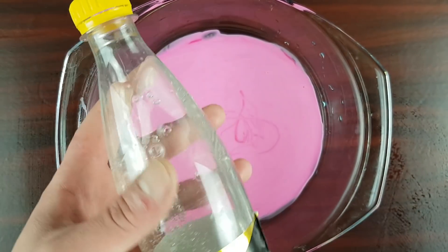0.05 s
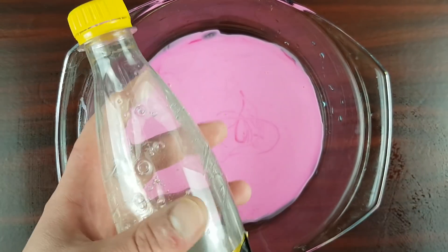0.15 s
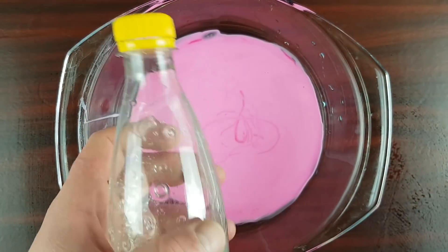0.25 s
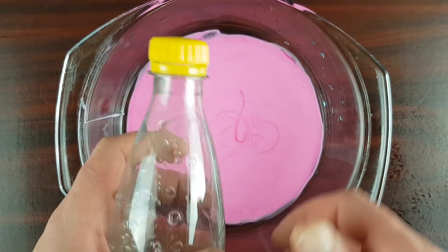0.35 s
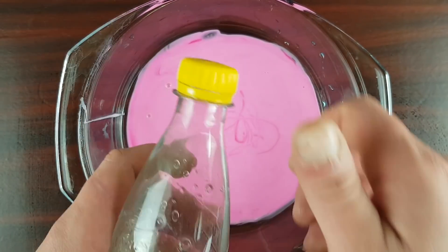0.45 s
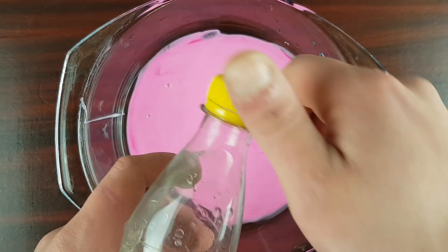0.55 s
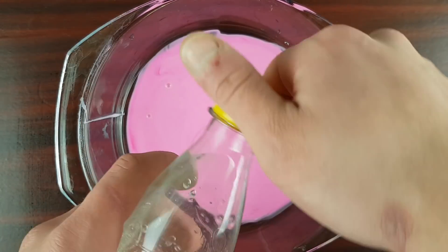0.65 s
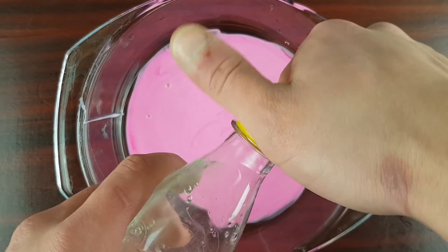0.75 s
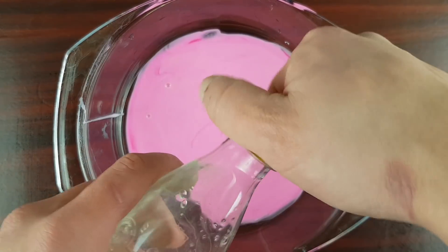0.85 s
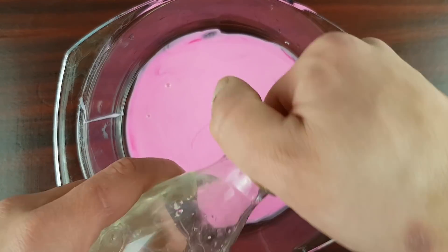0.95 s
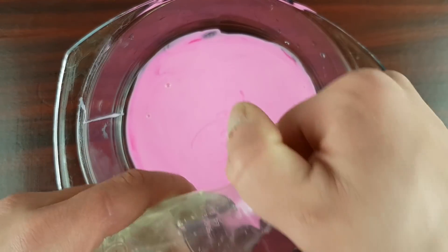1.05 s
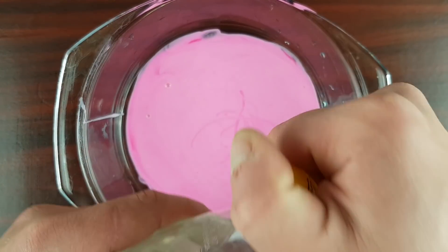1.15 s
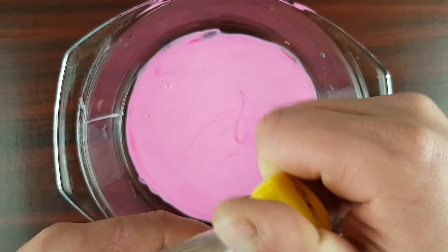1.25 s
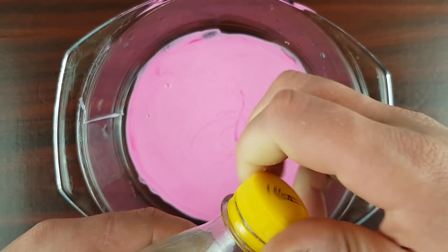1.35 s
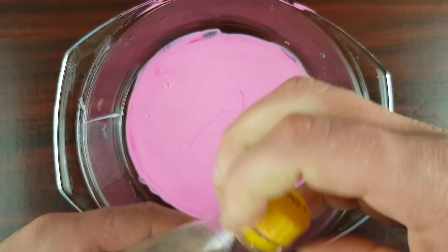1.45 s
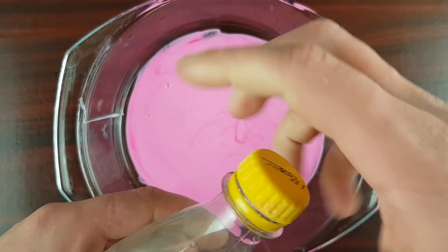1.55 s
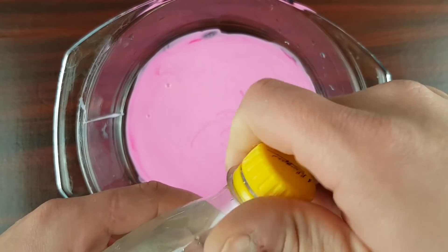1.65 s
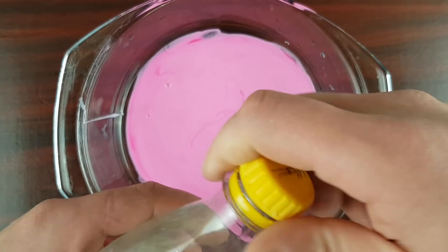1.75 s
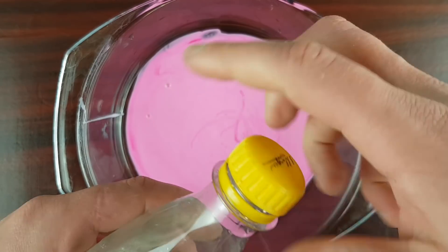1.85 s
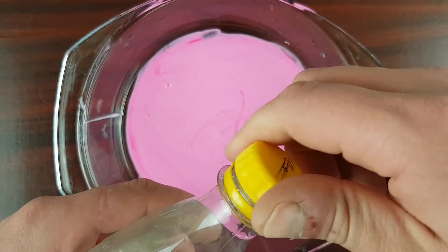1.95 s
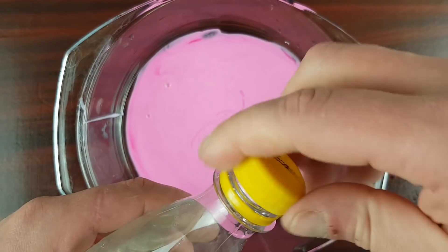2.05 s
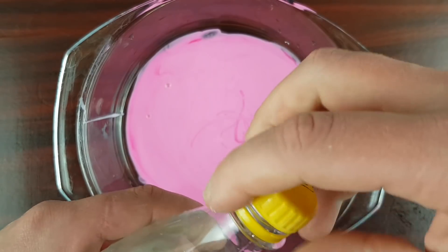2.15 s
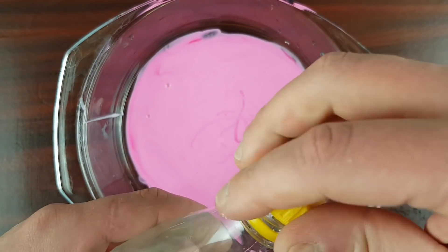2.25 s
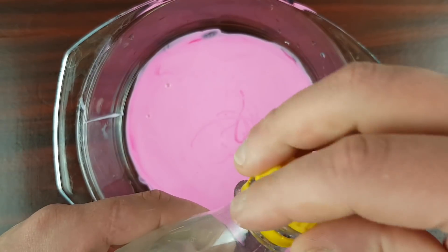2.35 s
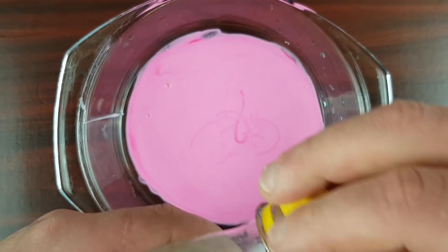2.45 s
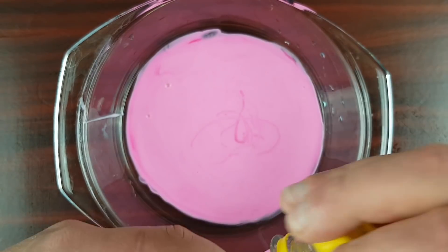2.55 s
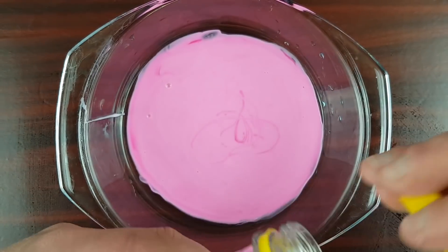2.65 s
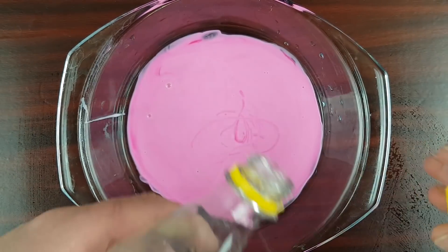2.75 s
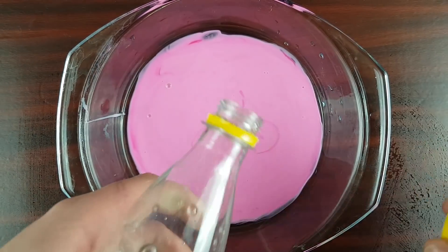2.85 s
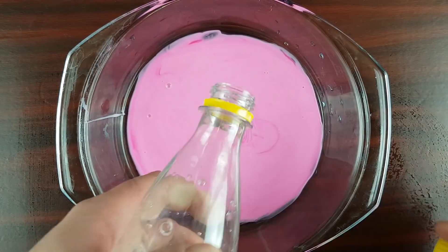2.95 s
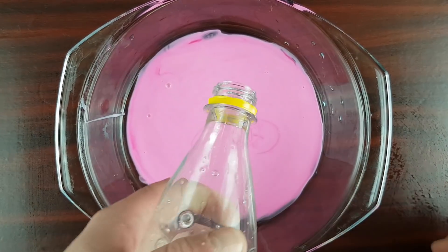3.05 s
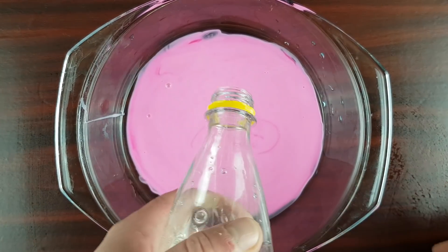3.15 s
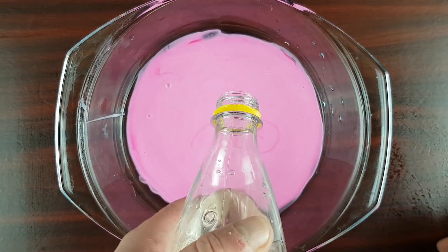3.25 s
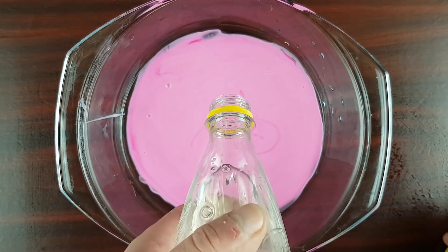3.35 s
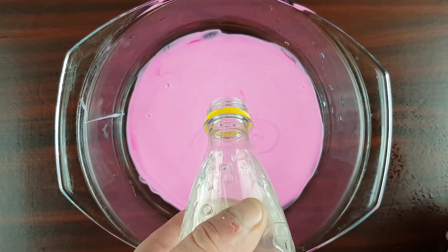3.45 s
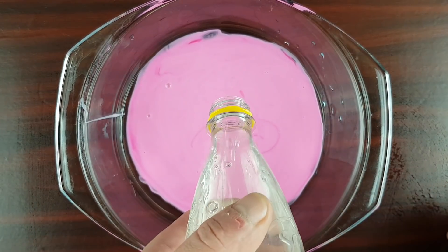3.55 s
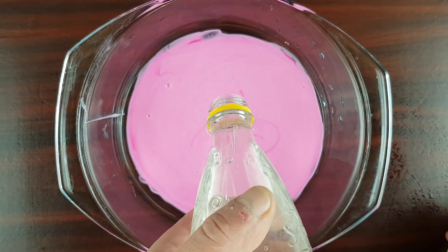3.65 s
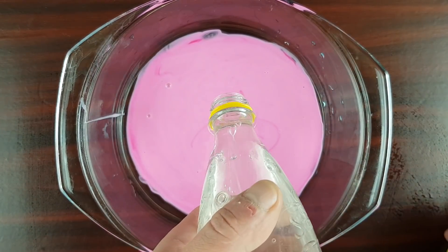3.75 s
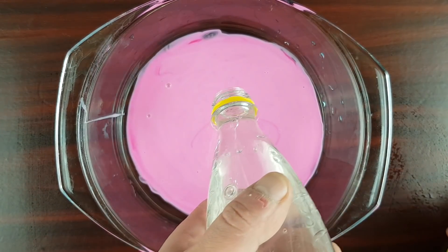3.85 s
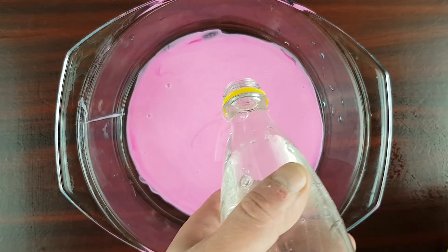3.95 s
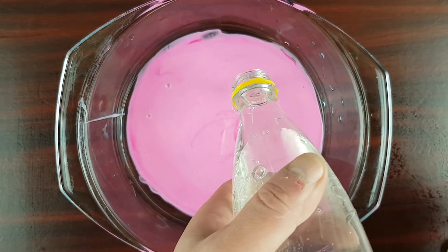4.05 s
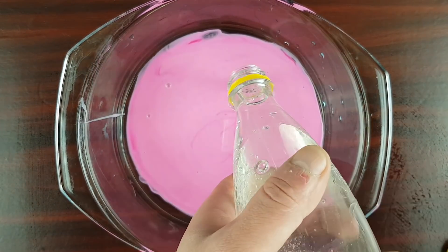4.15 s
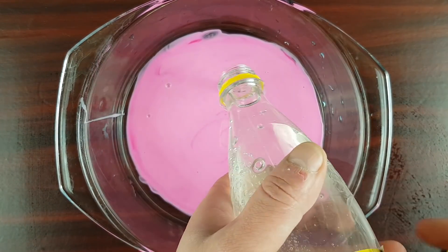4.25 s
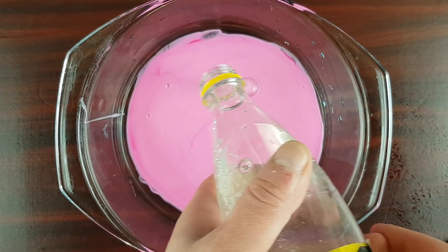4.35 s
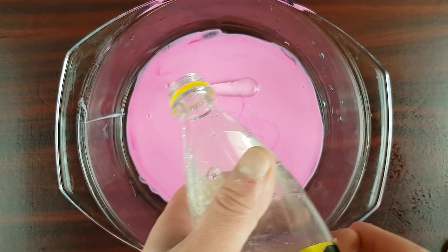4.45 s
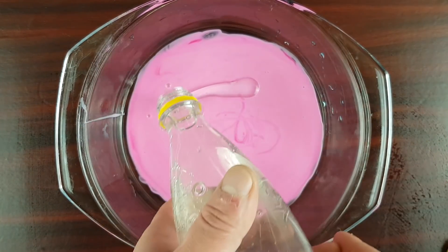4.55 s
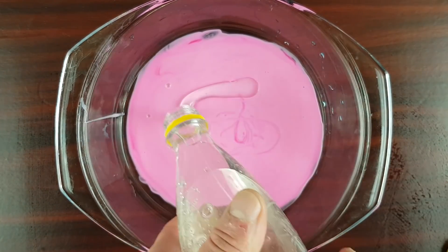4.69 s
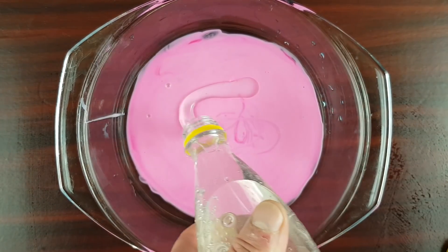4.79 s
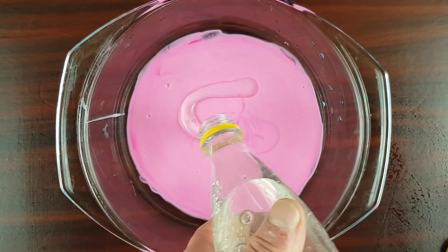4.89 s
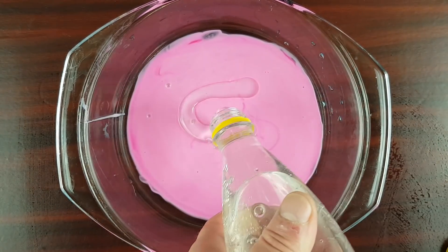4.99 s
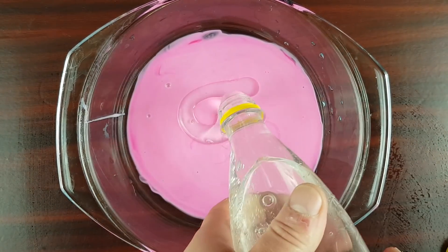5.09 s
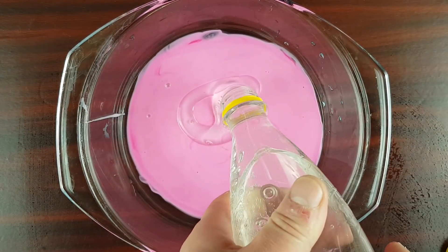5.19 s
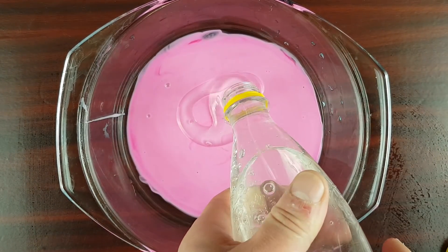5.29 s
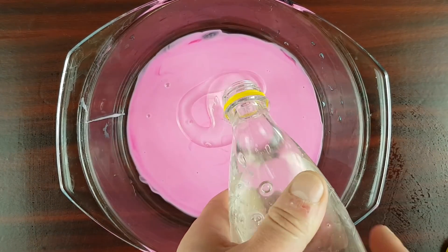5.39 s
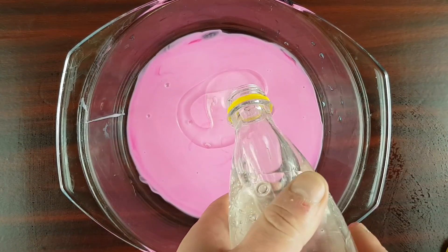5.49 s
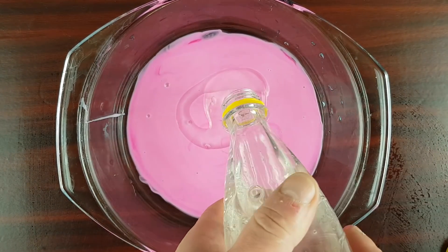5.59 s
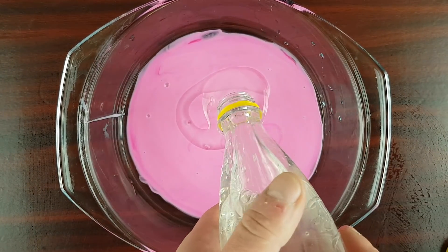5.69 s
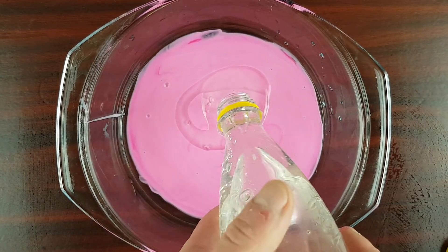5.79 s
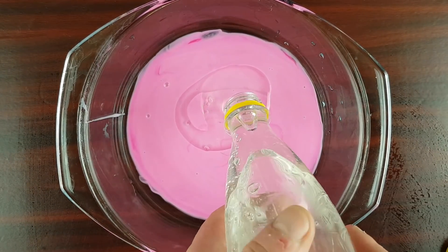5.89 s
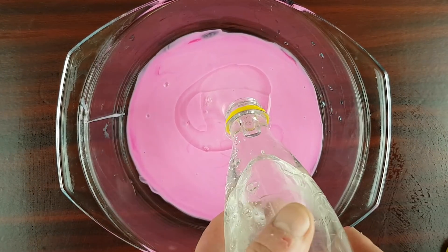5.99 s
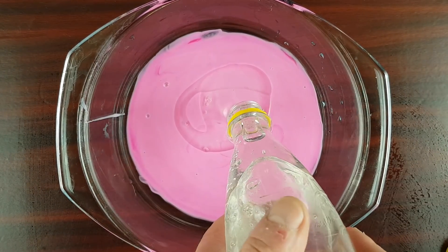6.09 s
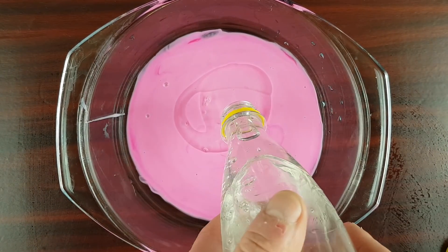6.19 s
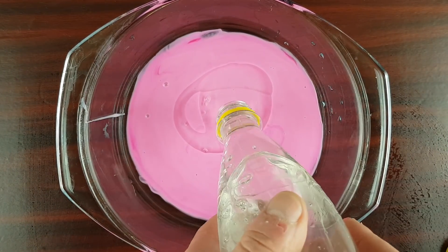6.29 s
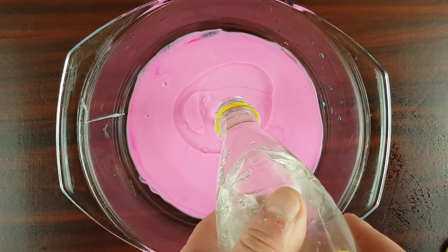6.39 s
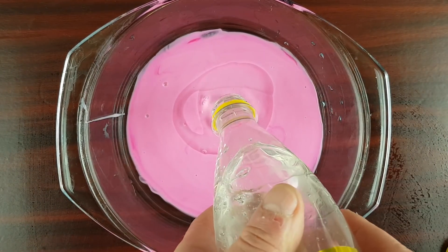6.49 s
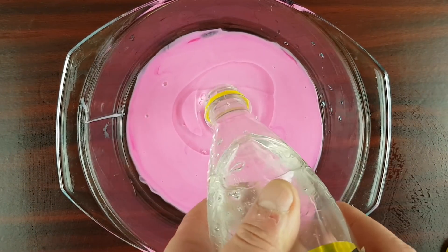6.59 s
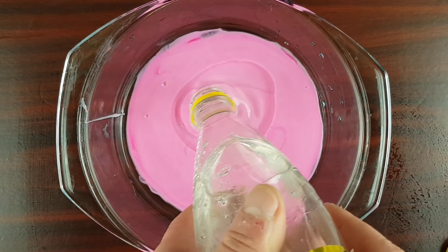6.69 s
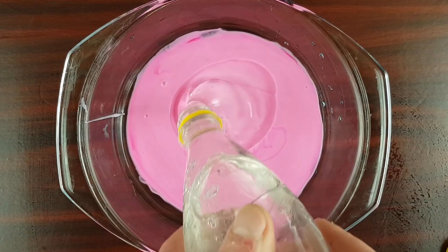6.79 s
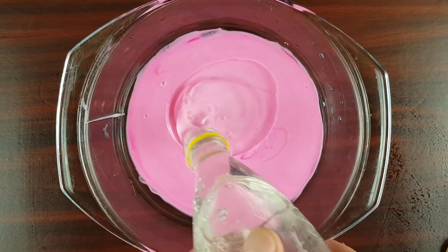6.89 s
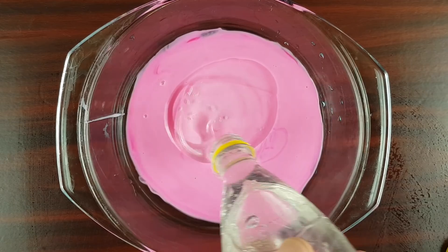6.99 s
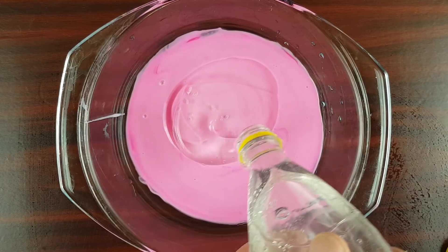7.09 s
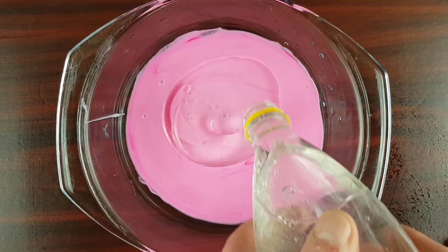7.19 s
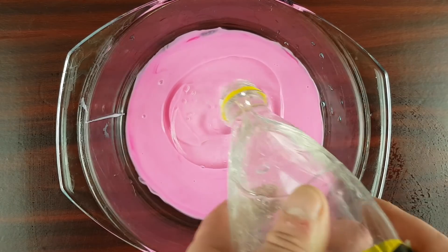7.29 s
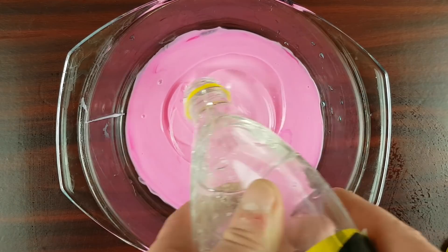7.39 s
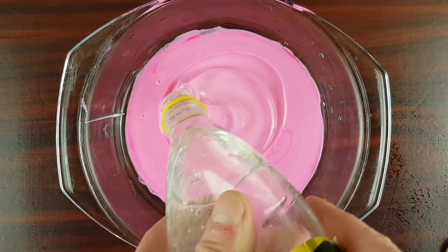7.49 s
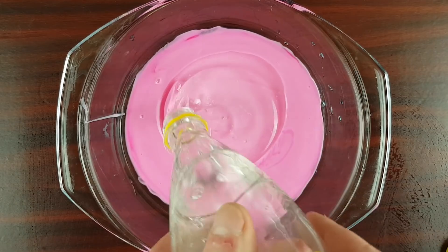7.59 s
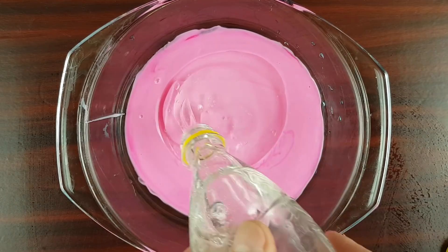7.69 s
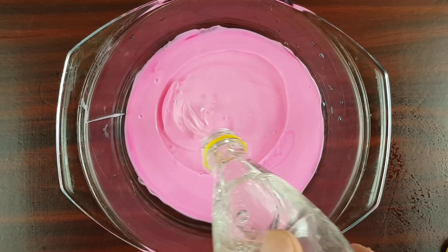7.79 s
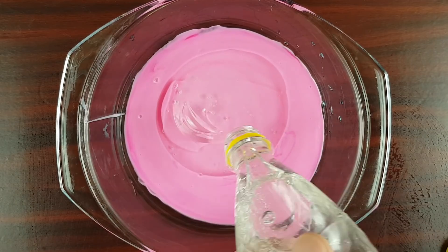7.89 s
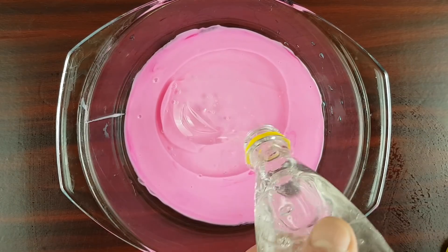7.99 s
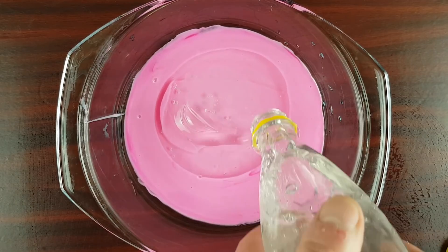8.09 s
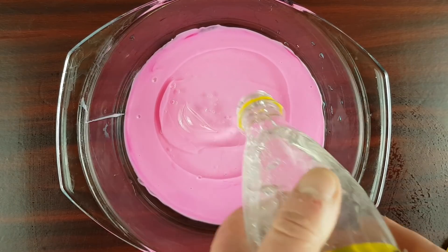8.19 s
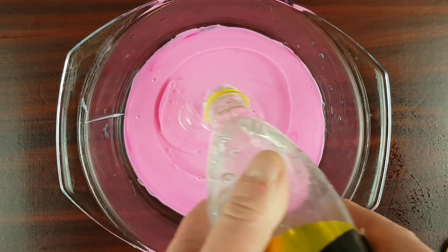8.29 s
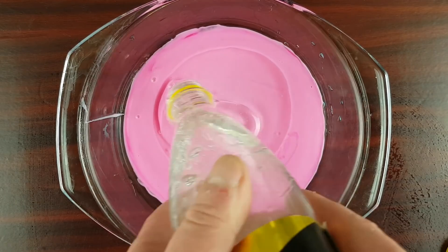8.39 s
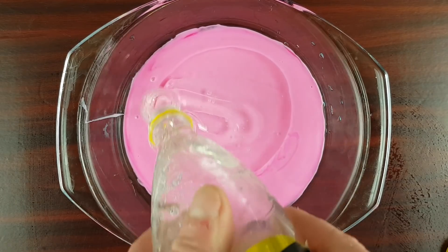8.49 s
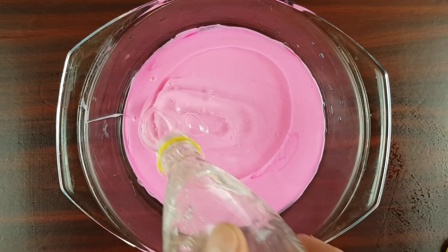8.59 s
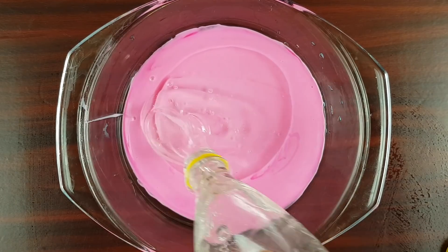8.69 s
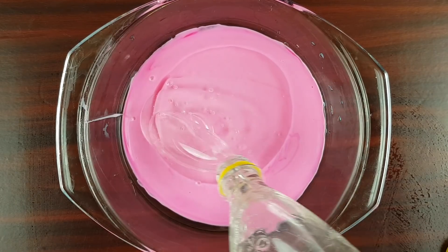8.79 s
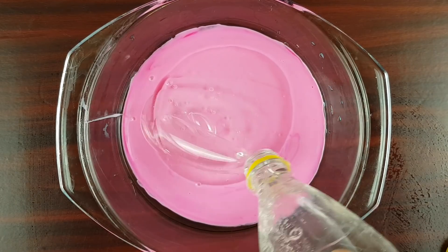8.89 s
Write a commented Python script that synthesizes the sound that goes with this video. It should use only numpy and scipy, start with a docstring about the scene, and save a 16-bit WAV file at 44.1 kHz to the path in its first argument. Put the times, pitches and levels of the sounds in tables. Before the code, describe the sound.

Small gritty cap creaks give way to sporadic loud crackling pops of a squeezed plastic bottle in a small room, over faint hiss.

```python
"""A thin plastic bottle is uncapped close by in a small room, then squeezed to pour a thick, silent liquid.
After a low handling bump the cap creaks and ticks as runs of tiny catches; skin hisses on its ribs as noise.
As the uncapping ends, a low sine drone steps up in pitch; a noise rumble and a hum have grown under it.
Then the wall buckles under the thumb: struck modes and noise make sharp pops and dull thumps.
Late on, a gliding note marks a bubble at the neck and the bottle's air booms; noise hisses throughout."""
import sys
import numpy as np
from scipy import signal
from scipy.fft import rfft, irfft, next_fast_len
from scipy.io import wavfile

SR = 44100
rng = np.random.default_rng(int(sys.argv[2]) if len(sys.argv) > 2 else 0)


def output_pcm(signal):
    """Save a mono or channel-first signal as 16-bit PCM at the path in sys.argv[1].

    Samples are clipped to [-1, 1] before scaling.
    """
    pcm = np.clip(np.atleast_2d(signal).T, -1, 1) * 32767
    wavfile.write(sys.argv[1], SR, np.round(pcm).astype(np.int16))


N = 394254
TIME = np.arange(N) / SR

# modes of the bottle wall: f/Hz, relative level/dB, t60/s
SHELL_MODES = [(288, -24.5, 0.023), (365, -13.5, 0.05), (585.6, -16.5, 0.053), (604, -7, 0.028),
               (706, -10.5, 0.025), (982, -23.5, 0.074), (1094, -32, 0.038), (1470, -29, 0.01),
               (2010, -19.5, 0.029), (2250, -32, 0.067), (2383, -23, 0.029), (2777, -46, 0.061),
               (3210, -29, 0.023), (4516, -20.5, 0.0099), (4540, -39, 0.046)]
# slips of the cap and of the fingers, and a low handling bump at the start:
# t/s, level/dB, length/s, highest f/Hz
SLIP_EVENTS = [(0.367, -53.5, 0.057, 82), (0.62, -50, 0.0044, 5230), (0.898, -51.5, 0.0087, 5920),
               (0.922, -54.5, 0.0027, 347), (1.297, -47.5, 0.011, 1900), (1.407, -39, 0.0073, 4000),
               (1.441, -36.5, 0.01, 3170), (1.443, -50.5, 0.009, 350), (1.496, -48, 0.0028, 3000),
               (1.622, -45, 0.0044, 1010), (1.704, -33.5, 0.0051, 4600), (1.783, -37.5, 0.0054, 4400),
               (1.99, -44, 0.0095, 5170), (2.016, -54, 0.052, 3170), (2.095, -46.5, 0.013, 4130),
               (2.262, -44, 0.02, 2980), (2.5, -49.5, 0.0076, 2020), (2.592, -43, .015, 3370),
               (3.508, -45.5, 0.0088, 2400), (3.647, -51, 0.0032, 1000), (5.839, -46, 0.003, 2960),
               (7.322, -53, 0.002, 4600), (7.393, -44, 0.0022, 4570)]
# spectrum of cracking plastic: f/Hz, relative level/dB per Hz
CRACK_SPECTRUM = [(400, 7), (1000, 9), (2200, 11), (4800, -0.5), (7000, -14), (15000, -12)]


def from_db(db):
    """Amplitude gain is ten to the power of the level in decibels over 20."""
    return 10 ** (np.asarray(db) / 20)


def rms_one(x):
    """Dividing by the root mean square gives unit power."""
    return x / np.sqrt(np.mean(x ** 2) + 1e-20)


def add(track, s, sound):
    """Superposition: sounds add linearly, here from time s on."""
    start = max(round(s * SR), 0)
    track[start:start + len(sound)] += sound[:N - start]


def low_pass(x, hz, order):
    """Causal Butterworth low-pass: a maximally flat passband."""
    sections = signal.butter(order, min(hz, SR * .45), fs=SR, output="sos")
    return signal.sosfilt(sections, x + 1e-18)


def high_pass(x, hz, order):
    """Causal Butterworth high-pass: a maximally flat passband."""
    sections = signal.butter(order, min(hz, SR * .45), "high", fs=SR, output="sos")
    return signal.sosfilt(sections, x + 1e-18)


def hump(x, hz, octaves):
    """A broad band-pass: high-pass and low-pass in series, some octaves to each side."""
    return low_pass(high_pass(x, hz / 2 ** octaves, order=2), hz * 2 ** octaves, order=2)


def noise(colour, size):
    """Spectral shaping: white noise weighted by a table of f/Hz, level/dB, at unit power."""
    hz, db = np.transpose(colour)
    padded = next_fast_len(size)
    grid = np.fft.rfftfreq(padded, 1 / SR) + 0.0013
    bass_cut = np.minimum(grid / hz[0], 1) ** 2   # 12 dB per octave below the first point
    gain = from_db(np.interp(np.log(grid), np.log(hz), db)) * bass_cut
    spectrum = rfft(rng.standard_normal(padded)) * gain
    return rms_one(irfft(spectrum, padded)[:size])


def ring(t, hz, t60):
    """A struck mode: a sine whose exponential decay takes t60 seconds for 60 dB."""
    return np.sin(2 * np.pi * hz * t) * from_db(-60 * t / t60)


def pops(runaway_s=0.00056, crack_db=-11, crack_t60=0.031, dent_t60=0.025, radiate_hz=65):
    """Snap-through buckling: the wall gives way ever faster; dent and shell ring, the filled bottle thumps."""
    # buckles of the wall: t/s, level/dB, sharpness f/Hz, shell ring/dB, dent f/Hz, dent level/dB
    buckles = [(5.0444, -16.5, 1426, -1, 243, 2), (5.343, -43.5, 486, -12, 281, -6),
               (5.4893, -7, 6100, 0.5, 630, -4.5), (5.509, -17.5, 5770, 10.5, 1880, -2),
               (6.303, -42.5, 800, -8, 301, -2.5), (7.2521, -7.5, 4970, -1, 329, -10.5),
               (7.6771, -11, 2400, -7.5, 662, -11), (7.938, -24.5, 2070, 1.5, 296, -13.5),
               (7.967, -34, 910, -10.5, 324, -26.5), (8.0584, -8.5, 9150, 0.5, 1860, -20),
               (8.399, -36.5, 1000, 0, 310, -2), (8.533, -64, 395, -13, 101, 32),
               (8.7203, -10.5, 4800, 0, 700, -1.5)]
    # a pop sharper than the reference rings brighter and thumps lower and less
    reference_hz, tilt_db_per_octave = 4350, 3
    reference_thump_hz, thump_fall_octaves = 126, 0.16   # pitch fall per octave of sharpness
    reference_thump_db, thump_loss_db_per_octave, thump_t60 = -7.5, 5, 0.034
    # the air in the bottle rings on after the sharpest pop
    boom_s, boom_db, boom_hz, boom_t60 = 8.0584, -20, 115, 0.34

    out, t, lead = np.zeros(N), TIME[:SR // 2], SR // 200
    suction = -np.exp(-TIME[:lead][::-1] / runaway_s)   # grows until the snap
    for s, db, sharp_hz, ring_db, dent_hz, dent_db in buckles:
        sharper = np.log2(sharp_hz / reference_hz)   # octaves
        tilt_db = tilt_db_per_octave * sharper
        thump_db = reference_thump_db - thump_loss_db_per_octave * sharper
        thump_hz = reference_thump_hz / 2 ** (thump_fall_octaves * sharper)
        # each dent has its own shape, so the modes differ a little in level (dB) and pitch (ratio)
        chance = rng.standard_normal((len(SHELL_MODES), 2)) * [1.5, .006]
        shell = np.zeros(len(t))
        for k, ((hz, mode_db, t60), (louder, higher)) in enumerate(zip(SHELL_MODES, chance)):
            gain = from_db(mode_db + tilt_db * np.log2(hz / 1000) + louder)
            shell += gain * ring(t, hz * (1 + higher), t60) * (-1) ** k   # modes alternate in sign
        crack = from_db(crack_db + 2 * tilt_db) * from_db(-60 * t / crack_t60) * noise(CRACK_SPECTRUM, len(t))
        dent = from_db(dent_db) * ring(t, dent_hz, dent_t60)
        thump = from_db(thump_db) * ring(t, thump_hz, thump_t60)
        pop = np.concatenate([suction, from_db(ring_db) * (shell + crack) + dent + thump])
        add(out, s - lead / SR, from_db(db) * low_pass(pop, sharp_hz, order=2))
    add(out, boom_s, from_db(boom_db) * ring(t, boom_hz, boom_t60))
    return high_pass(out, radiate_hz, order=2)   # so small a wall radiates no deep bass


def slips(catches_per_s=700, grit=0.27, shell_db=-15, knock_db=-14, knock_hz=320, knock_t60=0.045,
          release_db=8):
    """Stick-slip friction: a dying run of tiny catches stirs the wall, and the body knocks softly.

    The low handling bump is made in the same way.
    """
    # while the thread grips: start t/s, end t/s
    thread_grip = (1.35, 2.3)
    # a weaker, duller run then comes just before each slip
    catch_lead_s, catch_db, catch_duller_octaves = 0.016, -11, .3
    slip_octaves = 2.6   # the sound reaches this far below its highest frequency

    out, t = np.zeros(N), TIME[:SR // 6]
    wall = sum(from_db(db) * ring(t, hz, t60) * (-1) ** k for k, (hz, db, t60) in enumerate(SHELL_MODES))
    wall = wall / np.linalg.norm(wall)
    knock = from_db(knock_db) * ring(t, knock_hz, knock_t60)
    first_catches = [(s - catch_lead_s, db + catch_db, length, hz / 2 ** catch_duller_octaves)
                     for s, db, length, hz in SLIP_EVENTS if thread_grip[0] < s < thread_grip[1]]
    for s, db, length, high_hz in list(SLIP_EVENTS) + first_catches:
        low_hz = high_hz / 2 ** slip_octaves
        catches = (rng.random(len(t)) < catches_per_s / SR) + grit * rng.standard_normal(len(t))
        run = catches * np.exp(-(t / length) ** 2)
        run[round(min(length / 4, t[-1]) * SR)] += from_db(release_db)   # one catch gets an extra jolt
        run = run + from_db(shell_db) * signal.fftconvolve(run, wall)[:len(t)]
        # the bass falls away gently, then more steeply an octave lower
        run = high_pass(high_pass(run, low_hz, order=1), low_hz / 2, order=1)
        run = low_pass(run, high_hz, order=4)
        run = run * np.sqrt(length * SR / 2) / np.linalg.norm(run)
        add(out, s, from_db(db) * (run + knock))
    return out


def ticks(decay_s=0.0034, body_db=-17, snap_db=13):
    """Impulsive creasing: one bright snap and a very short noise burst, with a little body below."""
    # crisp ticks of the plastic: t/s, level/dB, centre f/Hz
    creases = [(.852, -53.5, 9400), (1.061, -51.5, 10000), (2.880, -50.5, 7400), (4.768, -55.5, 10500),
               (4.976, -52, 4340), (5.045, -54.5, 11000), (5.319, -50, 12450), (5.387, -52.5, 8330),
               (5.4879, -46, 12000), (6.845, -58, 7960), (7.253, -37, 13500), (7.3224, -33.5, 14100),
               (7.39, -39, 13600), (7.647, -50, 7840), (7.6665, -38, 14250), (7.674, -44, 11000),
               (7.835, -52.5, 5000), (7.921, -47.5, 4300), (8.0591, -33, 12500), (8.655, -49.5, 10600),
               (8.7219, -36.5, 12300)]
    # the closer a tick lies to the top, the narrower it is
    top_hz, widest_octaves = 17200, 0.98
    # each slip event has its tick: the duller the event, the fainter; equal in level at equal_hz
    slip_tick_hz, equal_hz, db_per_octave = 10900, 5260, 59

    out, t = np.zeros(N), TIME[:SR // 20]
    decay = np.exp(-t / decay_s)
    of_slips = [(s, db + db_per_octave * np.log2(hz / equal_hz), slip_tick_hz)
                for s, db, _, hz in SLIP_EVENTS]
    for s, db, hz in list(creases) + of_slips:
        octaves = min(np.log2(top_hz / hz), widest_octaves)
        crease = rng.standard_normal(len(t)) * decay
        crease[0] = from_db(snap_db)
        burst = hump(crease, hz, octaves)
        burst = burst * np.sqrt(decay_s * SR / 2) / np.linalg.norm(burst)
        body = from_db(body_db) * noise(CRACK_SPECTRUM, len(t)) * decay
        add(out, s, from_db(db) * (burst + body))
    return out


def slide(rough_db=2.5):
    """Sliding friction: skin on the ribs of the cap hisses as noise of randomly fluctuating level."""
    # mean level of the slide: t/s, level/dB
    slide_levels = [(1.05, -72), (1.15, -72.5), (1.28, -59.5), (1.34, -66.5), (1.42, -51.5), (1.50, -76),
                    (1.58, -97)]
    # its spectrum: f/Hz, relative level/dB per Hz
    slide_spectrum = [(400, -9), (1200, -13), (2300, -5.5), (5000, -10), (9000, -12.5), (15000, -18)]
    grain = rms_one(low_pass(rng.standard_normal(N), 110, order=2))
    level = np.interp(TIME, *np.transpose(slide_levels), left=-150, right=-150)
    return from_db(level + rough_db * grain) * noise(slide_spectrum, N)


def bubble(start_s=7.650, level_db=-36, first_hz=760, last_hz=1600, length_s=0.0095):
    """Bubble resonance: air slipping in at the neck sounds a note that wobbles in level and glides up."""
    wobble_depth, wobble_hz = .55, 400
    out, age = np.zeros(N), np.linspace(0, 1, int(length_s * SR))
    phase = 2 * np.pi * np.cumsum(first_hz + (last_hz - first_hz) * age) / SR
    waver = rms_one(low_pass(rng.standard_normal(SR), wobble_hz, order=2))[-len(age):]
    wobble = 1 + wobble_depth * waver
    envelope = np.minimum(10 * age, 1) * np.sqrt(1 - age)
    add(out, start_s, from_db(level_db) * wobble * envelope * np.sin(phase))
    return out


def bottle():
    """Superposition of everything that the bottle radiates in one direction."""
    return pops() + slips() + ticks() + slide() + bubble()


def room(x, first_echo_s=0.0016, build_s=0.0024):
    """Reverberation by convolution: diffuse echoes die band by band, and one standing wave booms on."""
    # the echoes: f/Hz, level/dB, t60/s
    room_bands = [(87, -9, 0.17), (195.6, -7.5, 0.44), (332, -7, 0.3), (704, -7.5, 0.25), (2000, -10, 0.32),
                  (4700, -12, 0.32), (6800, -8, 0.18), (10300, -13, 0.32), (15000, -3.5, 0.06)]
    mode_hz, mode_t60, mode_db = 118.37, 0.41, 2.5
    t, (hz, db, t60) = TIME[:SR // 2], np.transpose(room_bands)
    edges = np.geomspace(70, 18000, 17)
    build = np.clip((t - first_echo_s) / build_s, 0, 1)
    tail = np.zeros(len(t))
    for low, high in zip(edges, edges[1:]):
        centre = np.log(low * high) / 2   # log of the geometric mean
        sections = signal.butter(2, [low, high], "band", fs=SR, output="sos")
        band = signal.sosfilt(sections, rng.standard_normal(len(t)))
        band = band * build * from_db(-60 * t / np.interp(centre, np.log(hz), t60))
        # energy in proportion to bandwidth
        band = band / np.linalg.norm(band) * np.sqrt(2 * (high - low) / SR)
        tail += band * from_db(np.interp(centre, np.log(hz), db))
    damping = np.log(1000) / mode_t60
    boom = np.exp(-damping * t) * np.cos(2 * np.pi * mode_hz * t)
    boom = from_db(mode_db) * 2 * damping / SR * boom   # scaled by its gain at resonance
    return signal.fftconvolve(x, tail + boom)[:N]


def background(waver_db=1.0, swell_half_width_s=.17, hum_hz=100):
    """Tones and shaped noise: a wavering drone rises as it swells, over a dull rumble and mains hum."""
    # the drone apart from its swells: t/s, pitch f/Hz, level/dB
    drone_course = [(0, 30.32, -69), (2.5, 30.5, -79), (2.7, 37.97, -66.5), (3.3, 32.9, -69.5),
                    (8.94, 33, -64.5)]
    # its swells: t/s, pitch rise/Hz, level rise/dB
    drone_swells = [(2.78, 15, 4), (3.95, 7, 10), (5.25, 6.7, 7), (6.15, 5, 7.5), (6.63, 6, 9.5),
                    (7.4, 4.5, 4), (8.15, 4, 11.5), (8.68, 7.2, 5)]
    # course of the rest: t/s, rumble level/dB, mains hum level/dB
    rumble_and_hum = [(0, -100, -100), (2.5, -72, -92), (2.9, -68.5, -72.5), (4.499, -68.5, -76.5),
                      (6.5, -68, -77.5), (8.94, -66, -64.5)]
    # spectrum of the rumble: f/Hz, relative level/dB per Hz
    rumble_spectrum = [(22, 3), (35, -3), (55, 0), (80, 4.5), (120, 1), (200, -5.5), (400, -16.5),
                       (900, -29), (4000, -51.5)]

    s, hz, db = np.transpose(drone_course)
    hz, db = np.interp(TIME, s, hz), np.interp(TIME, s, db)
    for s, rise_hz, rise_db in drone_swells:
        swell = np.exp(-((TIME - s) / swell_half_width_s) ** 2)
        hz, db = hz + rise_hz * swell, db + rise_db * swell
    waver = waver_db * rms_one(low_pass(rng.standard_normal(N), 3.6, order=2))
    drone = from_db(db + waver) * np.sqrt(2) * np.sin(2 * np.pi * np.cumsum(hz) / SR)
    s, rumble_db, hum_db = np.transpose(rumble_and_hum)
    rumble = from_db(np.interp(TIME, s, rumble_db)) * noise(rumble_spectrum, N)
    hum = from_db(np.interp(TIME, s, hum_db)) * np.sqrt(2) * np.sin(2 * np.pi * hum_hz * TIME)
    return drone + rumble + hum


def hiss(level_db=-66.5):
    """Incoherent noise: each channel has its own faint steady hiss."""
    # f/Hz, relative level/dB per Hz
    hiss_spectrum = [(60, -15), (120, -15), (220, -10.5), (400, -10), (600, -11.5), (1100, -15.5),
                     (2150, -18.5), (3400, -24.5), (5500, -31), (10000, -34), (15000, -27.5), (16000, -34)]
    return from_db(level_db) * np.array([noise(hiss_spectrum, N), noise(hiss_spectrum, N)])


def scene(right_db=-3.0, right_hz=370, leak_db=-33, shared_hz=450):
    """Coherence falls with frequency: the muffled right channel shares only the low echoes with the left."""
    direct = bottle()
    # the far side of the bottle radiates with other fine detail, and both sides fill the room
    front, back = room(direct) / np.sqrt(2), room(bottle()) / np.sqrt(2)
    left = direct + front + back
    shared = low_pass(front + back, shared_hz, order=1)
    separate = high_pass(front - back, shared_hz, order=1)
    right = direct + shared + separate
    right = from_db(right_db) * low_pass(right, right_hz, order=1) + from_db(leak_db) * left
    channel_gain = from_db([[0], [-2.5]])   # the background is weaker on the right
    return np.array([left, right]) + background() * channel_gain + hiss()


def record(dry, cutoff_hz=16200):
    """Band limiting: an elliptic low-pass cuts the top steeply."""
    return signal.sosfilt(signal.ellip(10, .1, 80, cutoff_hz, fs=SR, output="sos"), dry)


dry = scene()
out = record(dry)
output_pcm(out)
```